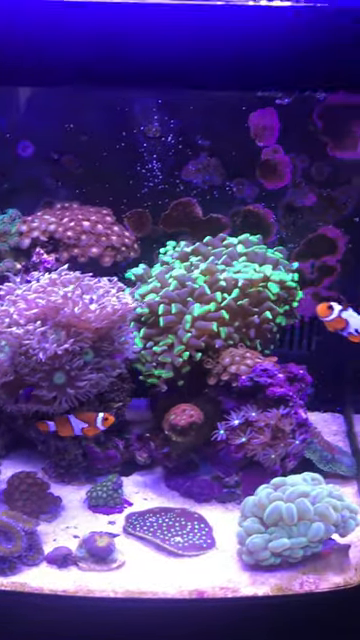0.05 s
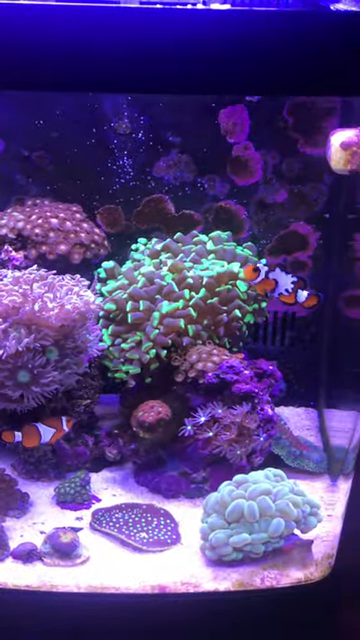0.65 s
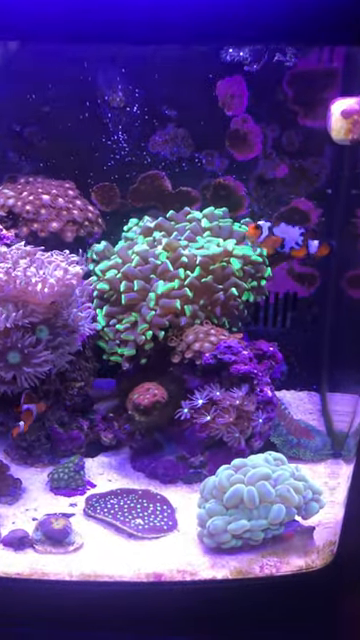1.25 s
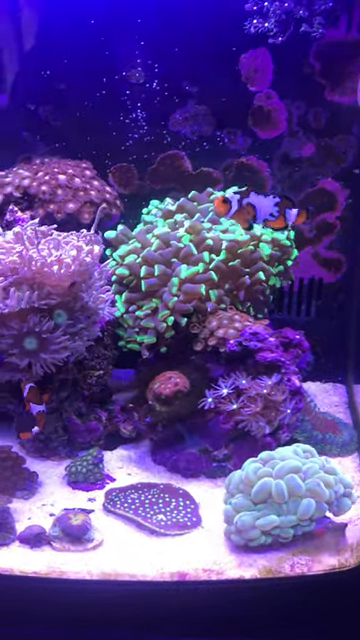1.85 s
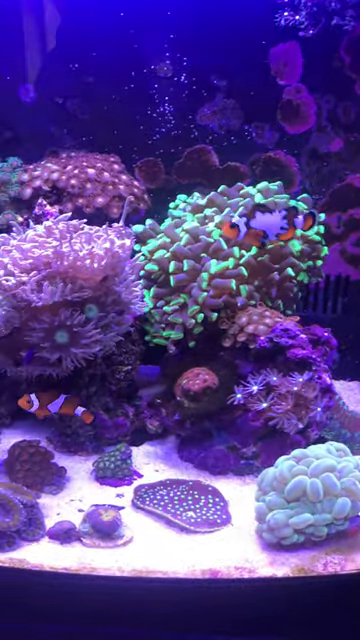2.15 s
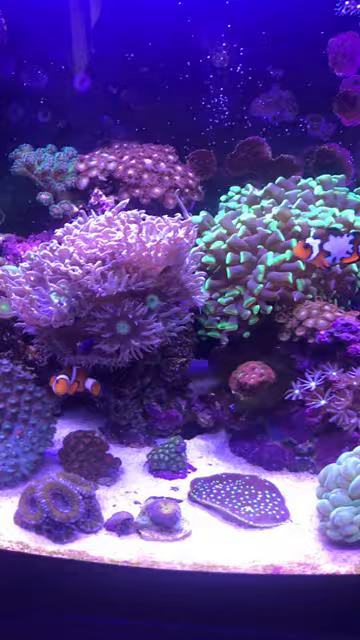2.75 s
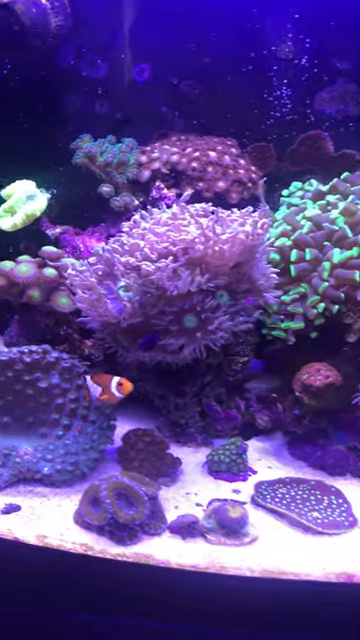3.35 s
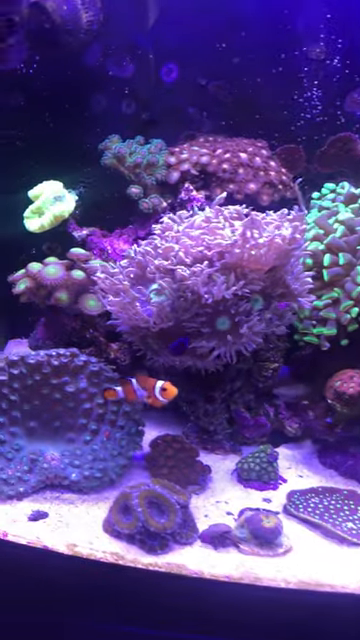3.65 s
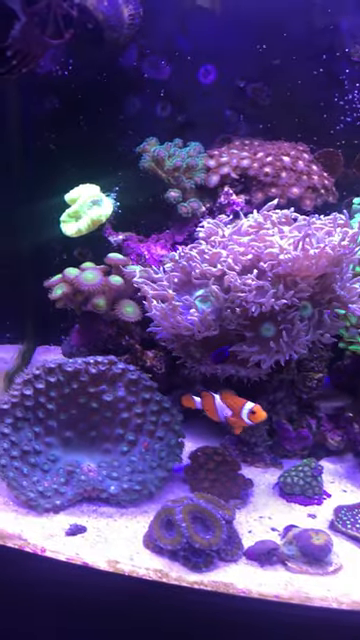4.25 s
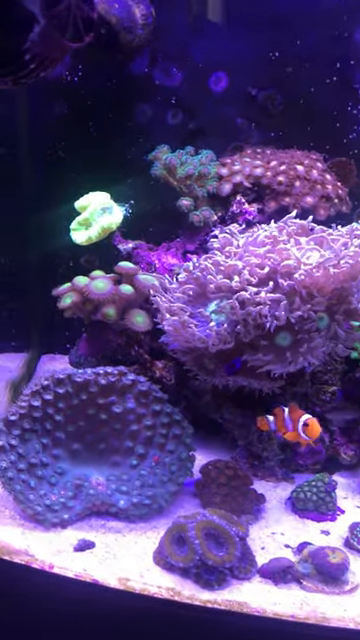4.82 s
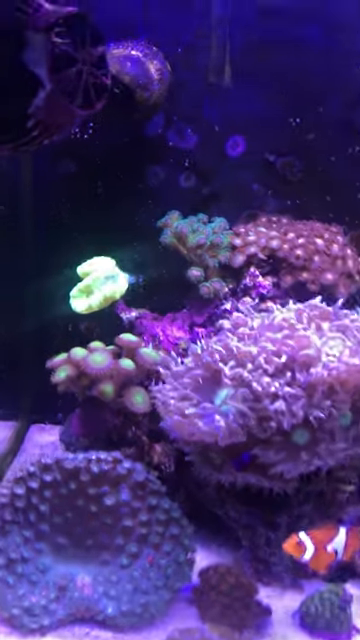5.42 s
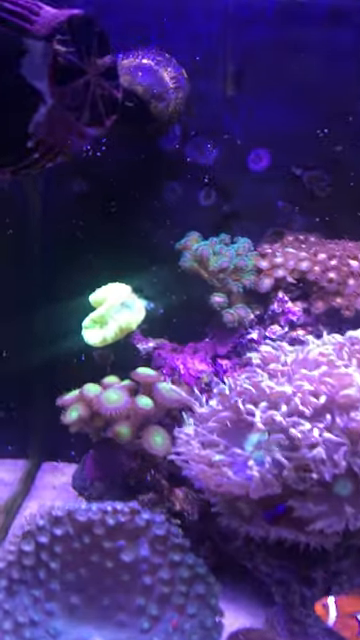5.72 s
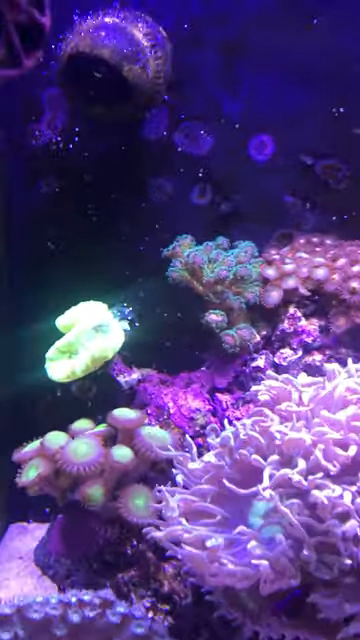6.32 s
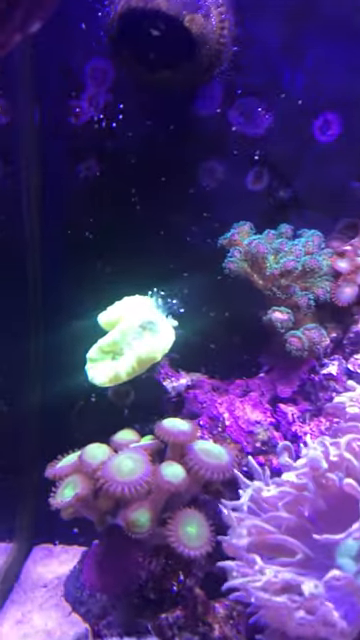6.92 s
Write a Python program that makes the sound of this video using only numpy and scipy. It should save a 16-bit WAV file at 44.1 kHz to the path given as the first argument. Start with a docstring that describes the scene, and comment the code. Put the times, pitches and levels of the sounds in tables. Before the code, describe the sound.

Close to a fish tank in a quiet room, faint water trickles, drips and gently sloshes over the low, constant hum of a pump. Past the middle come a few light plastic clicks and a thin, high squeak, then a sharper click with a dull bump, and one more click near the end. The hum and water carry on, along with light hiss and faint, rapid electrical ticking.

```python
"""A quiet room with a reef aquarium, heard from close to the front glass.
The pump hums at twice the mains frequency and throbs against its own impeller (its spinning blades).
Water rumbles, washes and sloshes; it trickles and drips as little air bubbles ring like bells.
From about 4 s a hand makes a few clicks on a plastic case, a thin squeak and one dull bump.
Faint, regular electrical ticks sit in the microphone hiss throughout."""
import sys
import numpy as np
from scipy import signal
from scipy.fft import rfft, irfft
from scipy.io import wavfile
from scipy.ndimage import uniform_filter1d

SR = 44100
rng = np.random.default_rng(int(sys.argv[2]) if len(sys.argv) > 2 else 0)


def store_wav(level_fs):
    """Save 16-bit WAV to argv[1]."""
    pcm = np.round(np.clip(np.atleast_2d(level_fs), -1, 1) * 32767)
    wavfile.write(sys.argv[1], SR, pcm.T.astype(np.int16))


N = 316638
TIME = np.arange(N) / SR
CUTOFF_HZ = 15750


def from_db(db):
    """Turn decibels into a number to multiply by."""
    return 10 ** (np.asarray(db) / 20)


def in_time(rows):
    """Join a table's timed points with straight lines: one curve for each column after the time."""
    s, *columns = np.transpose(rows)
    return [np.interp(TIME, s, c) for c in columns]


def at_hz(points, hz):
    """Read between a table's frequencies, giving every octave equal space."""
    known_hz, values = np.transpose(points)
    return np.interp(np.log(hz + 1e-9), np.log(known_hz), values)


def noise(spectrum):
    """Noise shaped by a table of frequencies and levels (power in each 1 Hz slice)."""
    gain = from_db(at_hz(spectrum, np.fft.rfftfreq(N, 1 / SR)))
    return irfft(rfft(rng.standard_normal(N)) * gain, N) * np.sqrt(SR / 2)


def drift(rate):
    """A random wander, typically of size 1, that changes about rate times a second."""
    slow = irfft(rfft(rng.standard_normal(N)) / (1 + (np.fft.rfftfreq(N, 1 / SR) / rate) ** 2), N)
    return (slow - slow.mean()) / slow.std()


def ring(push, hz, t60):
    """Each push starts a tone that fades by 60 dB in t60 seconds."""
    decay = from_db(-60 / (t60 * SR))
    step = 2 * np.pi * min(hz, SR / 2 - 1) / SR
    return signal.lfilter([0, np.sin(step)], [1, -2 * decay * np.cos(step), decay ** 2], push + 1e-18)


def whine(hz, width_hz):
    """An unsteady tone made from a narrow band of noise."""
    phase = 2 * np.pi * hz * TIME
    return drift(width_hz / 2) * np.cos(phase) + drift(width_hz / 2) * np.sin(phase)


def add(track, s, sound):
    """Mix a short sound into a track, starting at s seconds."""
    start = int(np.clip(s * SR, 0, len(track) - 1))
    track[start:start + len(sound)] += sound[:len(track) - start]


def room(dry, early_db, early_t60, tail_db):
    """The direct sound, quick echoes off glass and hood, then the room's fading tail."""
    # how long the room echoes: f/Hz, time to fade by 60 dB/s
    echo_times = [(300, 0.22), (2000, 0.31), (6000, 0.33), (15000, 0.23)]
    t = TIME[:SR // 2]
    edges_hz = np.geomspace(150, 19000, 8)
    tail = 0
    for low, high in zip(edges_hz, edges_hz[1:]):
        band_filter = signal.butter(2, [low, high], "band", fs=SR, output="sos")
        band = signal.sosfilt(band_filter, rng.standard_normal(len(t)))
        tail += band * from_db(-60 * t / at_hz(echo_times, np.sqrt(low * high)))
    early = rng.standard_normal(len(t)) * from_db(-60 * t / early_t60) * (t > .001)
    echoes = from_db(early_db) * early / np.linalg.norm(early)
    echoes += from_db(tail_db) * tail / np.linalg.norm(tail)
    return dry + signal.fftconvolve(dry, echoes)[:N]


def pump(mains_hz, rotor_hz, waver_db):
    """Magnets hum, five blades spin, the rotor makes the hum throb, and the housing rings."""
    # each tone's pitch is a sum: multiple of the mains frequency, multiple of the rotor speed
    multiples = [(2, 0), (3, 0), (4, 0), (5, 0), (6, 0), (7, 0), (8, 0), (9, 0), (10, 0), (0, 3), (0, 5),
                 (2, -1), (2, 1), (4, -5)]
    # average strength of each of those tones: level/dB
    tone_levels = [-43.5, -74.5, -63.5, -74.5, -74.5, -87.5, -80.5, -83.5, -84, -72.5, -54.5, -69, -62.6,
                   -67.5]
    # ring of the housing as the microphone moves past: t/s, level/dB
    housing_levels = [(0, -79), (2.5, -80), (3.5, -87), (7.18, -80)]
    hum = np.zeros(N)
    for (mains, rotor), level_db in zip(multiples, tone_levels):
        hz = mains * mains_hz + rotor * rotor_hz
        # the microphone moves through loud and quiet spots (standing waves): high tones waver most
        level = from_db(level_db + waver_db * hz / (2 * mains_hz) * drift(0.56))
        hum += level * np.sqrt(2) * np.sin(2 * np.pi * (hz * TIME + rng.random()))
    return hum + from_db(in_time(housing_levels)[0]) * whine(864.5, width_hz=25)


def circulation(ripple_db):
    """Moving water rumbles in the tank, washes along the surface and swishes with each slosh."""
    # rumble of water in tank and cabinet: f/Hz, level/dB
    rumble = [(20, -103), (30, -92), (50, -79), (75, -78), (100, -82.5), (140, -78.5), (200, -89),
              (270, -88.5), (330, -93.5), (385, -91), (450, -101), (900, -125)]
    # wash of the surface: f/Hz, relative level/dB
    wash_spectrum = [(250, -115), (480, -100), (620, -99), (760, -102), (1000, -104), (1500, -110.5),
                     (2400, -115), (3400, -117), (5000, -123), (8000, -132), (16000, -140)]
    # how strongly the wash reaches the microphone: t/s, gain/dB
    flow = [(0, 0.5), (1, 0.5), (2, 0), (3, 0), (4, 1), (4.8, .5), (5.6, 2), (6.4, 2), (7.18, 2)]
    # swish of a slosh: f/Hz, relative level/dB
    swish = [(1000, -128), (2200, -116), (2800, -111.5), (3200, -112.5), (3500, -108), (3900, -116),
             (5000, -125), (6500, -120), (9000, -134), (16000, -142)]
    wash = noise(wash_spectrum) * from_db(in_time(flow)[0] + ripple_db * drift(9.3))
    return noise(rumble) + wash + sloshing(first_s=.27, period_s=.418, swell_s=.11) * noise(swish)


def sloshing(first_s, period_s, swell_s):
    """The surface rocks at a steady pace: a loudness curve of uneven swells that slowly weaken."""
    start_db, fade_db_per_s, spread_db = -1.5, -0.56, 1.5
    times = np.arange(first_s, N / SR, period_s)
    strengths = from_db(start_db + fade_db_per_s * times + spread_db * rng.standard_normal(len(times)))
    return sum(strength * np.exp(-((TIME - s) / swell_s) ** 2) for s, strength in zip(times, strengths))


def microphone():
    """The microphone's own hiss, with two faint high whines."""
    # steady hiss: f/Hz, level/dB
    hiss = [(1000, -123.5), (7000, -123.5), (7900, -125.5), (8750, -121), (9700, -123.5), (10400, -128),
            (11300, -122.5), (16000, -123.5)]
    whines = from_db(-88.5) * whine(8740, width_hz=200) + from_db(-99) * whine(11400, width_hz=80)
    return noise(hiss) + whines


def bubble(hz, t60_at_1k, swell_s, rise):
    """A pocket of air starts ringing and climbs in pitch; small, high ones die sooner."""
    t = TIME[:SR // 20]
    t60 = t60_at_1k * np.sqrt(1000 / hz)
    level = (1 - np.exp(-t / swell_s)) * from_db(-60 * t / t60)
    pitch = hz * (1 + rise * (np.minimum(t / t60, 1) - .15))
    return level / level.max() * np.sin(2 * np.pi * np.cumsum(pitch) / SR)


def drip(hz, splash_db, splash_s, t60_at_1k, count):
    """One main bubble, then a splash of short-lived ones scattered around and above its pitch."""
    out = bubble(hz, t60_at_1k, swell_s=0.0031, rise=.14)
    for delay, pitch in rng.random((count, 2)):
        small_hz = min(hz * .88 * 1.9 ** (pitch ** 2), CUTOFF_HZ)
        small = bubble(small_hz, t60_at_1k=.011, swell_s=0.00044, rise=.1)
        gain = from_db(splash_db - 3.8 * delay) * rng.choice([-1, 1]) / np.sqrt(count)
        add(out, splash_s * delay ** 2, gain * small)
    return out / np.hypot(1, from_db(splash_db) / 2)  # keeps splashy drips from getting too loud


def trickle(per_s, level_db, spread_db, low_hz, high_hz):
    """Many faint bubbles burst at random on the surface; the smaller and higher, the quieter."""
    out = np.zeros(N)
    for when, pitch, strength in rng.random((int(per_s * N / SR), 3)):
        hz = low_hz * (high_hz / low_hz) ** pitch
        burst = drip(hz, splash_db=4.5, splash_s=.01, t60_at_1k=.03, count=3)
        add(out, when * N / SR, from_db(level_db + spread_db * strength ** 2 - 4 * pitch) * burst)
    return out


def fizz(per_s, level_db, spread_db):
    """The tiniest bubbles crackle in clumps."""
    popping = rng.random(N) < per_s * from_db(5 * drift(5)) / SR
    snaps = popping * rng.choice([-1, 1], N) * from_db(level_db + spread_db * rng.random(N) ** 2)
    pitches_hz = np.geomspace(2500, 13000, num=14)
    chosen = rng.integers(0, len(pitches_hz), N)
    return sum(ring(snaps * (chosen == k), hz, t60=14 / hz) for k, hz in enumerate(pitches_hz))


def radio_ticks(level_db, lead_db, buzz_db, buzz_s):
    """Regular radio bursts leak into the microphone: a tick as each starts, a louder one as it stops."""
    first_s, period_s, burst_s = .0594, .1024, .00093
    out, t = np.zeros(N), TIME[:SR // 500]
    for s in np.arange(first_s, N / SR, period_s):
        tick = from_db(buzz_db) * rng.standard_normal(len(t)) * np.exp(-t / buzz_s)
        tick[0] = 1
        add(out, s, from_db(level_db + lead_db) * tick)
        add(out, s + burst_s, from_db(level_db) * tick)
    return out


def soft_drips(per_s, level_db, spread_db, low_hz, high_hz):
    """Soft, high drips fall at uneven intervals, each at its own pitch."""
    out = np.zeros(N)
    for k, (delay, pitch, strength) in enumerate(rng.random((int(per_s * N / SR), 3))):
        hz = low_hz * (high_hz / low_hz) ** pitch
        plink = drip(hz, splash_db=4.5, splash_s=.02, t60_at_1k=.046, count=16)
        add(out, (k + delay) / per_s, from_db(level_db + spread_db * strength) * plink)
    return out


def loud_drips(gain_db, splash_gain_db):
    """The drips and bursting bubbles that stand out from the trickle."""
    # one drip a row: t/s, f/Hz, relative level/dB, relative splash level/dB
    drops = [(.451, 5050, -63.5, -9), (.587, 2120, -69, -13), (.827, 6804, -66, -10),
             (.853, 6780, -63.5, -6), (1.314, 1860, -65, -9), (1.47, 3850, -61.5, -1),
             (1.594, 5020, -66.5, -3), (1.688, 1910, -63, 2), (1.768, 2410, -68, -9),
             (1.989, 6890, -65.5, -3), (2.181, 3510, -64.5, -13), (2.41, 9850, -63.5, -11),
             (2.751, 4823, -64.5, -3), (2.852, 2130, -69, -12), (3.146, 2260, -64.5, 0),
             (3.61, 6100, -64, 7), (3.614, 2790, -60, -3), (3.643, 2842, -65, 1), (3.765, 2120, -61, -13),
             (3.922, 2153, -63.5, -20), (3.969, 3910, -67, -6), (4.113, 7000, -66, -4),
             (4.268, 2170, -67, -14), (5.018, 2120, -67.5, -12), (5.105, 1450, -59, -15),
             (5.513, 4909, -66.5, -6), (5.738, 1410, -61, -10), (5.739, 2430, -59.5, -13),
             (5.788, 9600, -62, 3), (5.805, 1400, -56, -17), (5.956, 2700, -61.5, -6),
             (6.507, 6070, -65.5, -8), (6.65, 6900, -63, -1), (6.798, 4680, -60.5, 0)]
    out = np.zeros(N)
    for s, hz, level_db, splash_db in drops:
        plink = drip(hz, splash_db + splash_gain_db, splash_s=0.02, t60_at_1k=0.053, count=16)
        add(out, s, from_db(level_db + gain_db) * plink)
    return out


def clicks(rub_db, rub_s):
    """A snap and a brief rub set the plastic case ringing; soft touches sound duller."""
    # touches of the hand: t/s, strength/dB, f/Hz above which the touch is dulled
    touches = [(4.108, -45, 1600), (4.354, -43.5, 1000), (4.793, -47.5, 2000), (4.831, -39, 800),
               (4.853, -36, 800), (5.1145, -32.5, 5600), (5.227, -45, 2500), (6.239, -36.5, 6000)]
    # tones of the case: f/Hz, relative level/dB, time to fade by 60 dB/s
    case_tones = [(510, -16, 0.015), (1000, -10.5, 0.01), (1450, -7.5, 0.0042), (2074, -9, 0.0055),
                  (2760, -7, 0.0043), (3930, -4, 0.0022), (6000, -5, 0.0015), (9050, -2.5, 0.0012),
                  (13500, -4.5, 0.0011)]
    push, t = np.zeros(N), TIME[:SR // 20]
    for s, strength_db, dull_hz in touches:
        contact = from_db(rub_db) * rng.standard_normal(len(t)) * np.exp(-t / rub_s)
        contact[0] = 1  # the snap
        softness = np.exp(-2 * np.pi * dull_hz / SR)
        add(push, s, from_db(strength_db) * signal.lfilter([1 - softness], [1, -softness], contact))
    return sum((-1) ** k * from_db(db) * ring(push, hz, t60) for k, (hz, db, t60) in enumerate(case_tones))


def squeak(gain_db, flutter_db, jitter):
    """Surfaces stick and slip very quickly, making a thin tone that flutters in level and pitch."""
    # course of the squeak: t/s, f/Hz, relative level/dB
    course = [(4.52, 4778, -85), (4.64, 4752, -71.5), (4.726, 4560, -73), (4.74, 4622, -68),
              (4.87, 4647, -76), (4.89, 4630, -68.5), (5.08, 4675, -86)]
    hz, level_db = in_time(course)
    sounding = (TIME > course[0][0]) & (TIME < course[-1][0])
    fade = uniform_filter1d(1. * sounding, size=600)
    phase = 2 * np.pi * np.cumsum(hz * (1 + jitter * drift(86))) / SR
    return fade * from_db(gain_db + level_db + flutter_db * drift(35)) * np.sin(phase)


def bump(start_s, swell_s, hold_s, t60, gain_db):
    """The hand bumps the case: a low thud swells, holds and dies away."""
    # the thud: f/Hz, relative level/dB
    thud = [(20, -106), (50, -74), (110, -66), (230, -77.5), (400, -99), (900, -125)]
    t = TIME - start_s
    swell = np.clip(t / swell_s, 0, 1)
    fade = from_db(-60 * np.maximum(t - swell_s - hold_s, 0) / t60)
    return from_db(gain_db) * swell * fade * noise(thud)


def scene():
    """Pump and water in the room, with the hand close by, mixed to one channel."""
    water = loud_drips(gain_db=0.5, splash_gain_db=12)
    water += trickle(per_s=40, level_db=-80.5, spread_db=11, low_hz=1503, high_hz=9000)
    water += soft_drips(per_s=3, level_db=-73.5, spread_db=5.5, low_hz=4520, high_hz=6000)
    water += fizz(per_s=70, level_db=-83, spread_db=10)
    mix = room(clicks(rub_db=-25, rub_s=0.0034), early_db=-5.5, early_t60=0.026, tail_db=-2.5)
    thin_tone = squeak(gain_db=1.5, flutter_db=2.5, jitter=0.0083)
    mix += room(thin_tone, early_db=-18, early_t60=.02, tail_db=-4)
    mix += pump(mains_hz=60, rotor_hz=17.512, waver_db=0.27) + circulation(ripple_db=1.08)
    mix += room(water, early_db=-2.5, early_t60=0.049, tail_db=-8)
    mix += bump(start_s=5.11, swell_s=.015, hold_s=0.11, t60=0.16, gain_db=-6)
    mix += microphone() + radio_ticks(level_db=-49.5, lead_db=-6, buzz_db=-17, buzz_s=0.00024)
    return mix[None]


def record(dry):
    """A steep filter cuts off the very highest treble."""
    return signal.sosfilt(signal.ellip(12, .1, 70, CUTOFF_HZ, fs=SR, output="sos"), dry)


dry = scene()
out = record(dry)
store_wav(out)
```